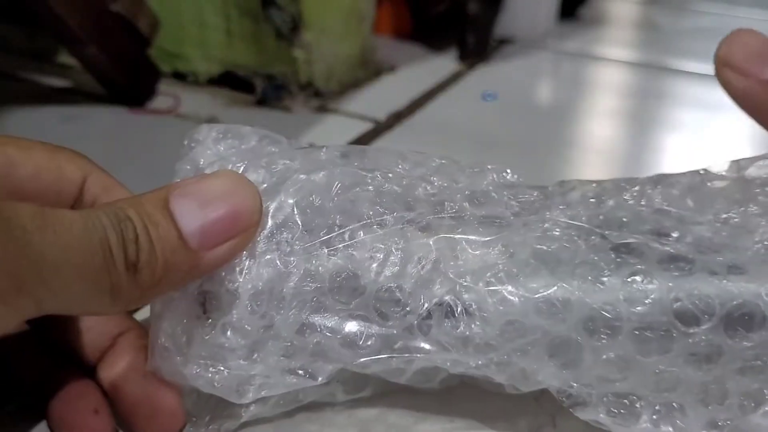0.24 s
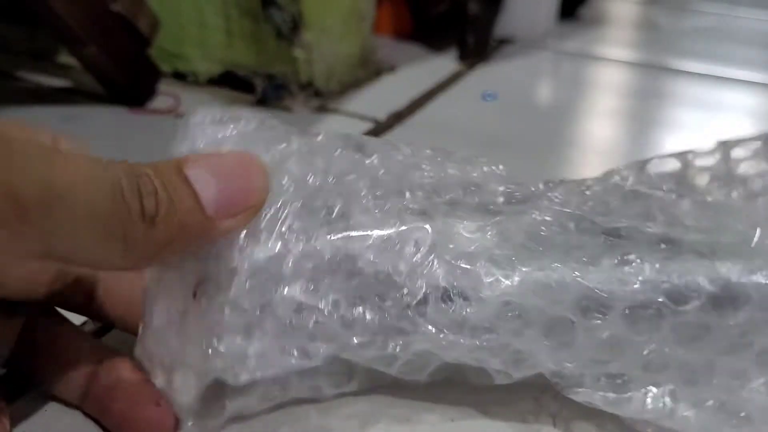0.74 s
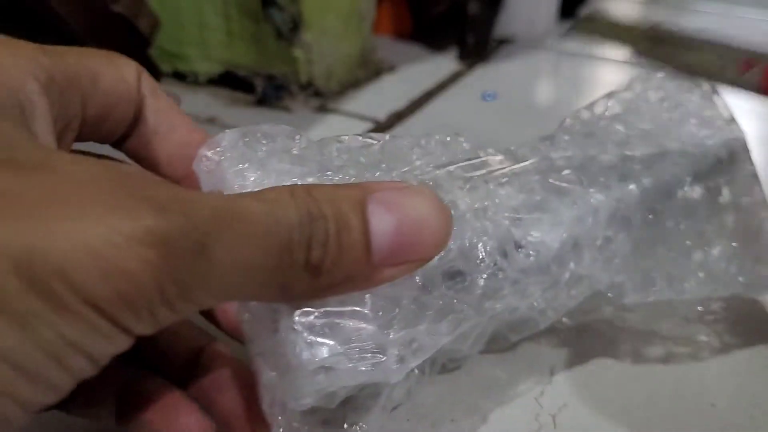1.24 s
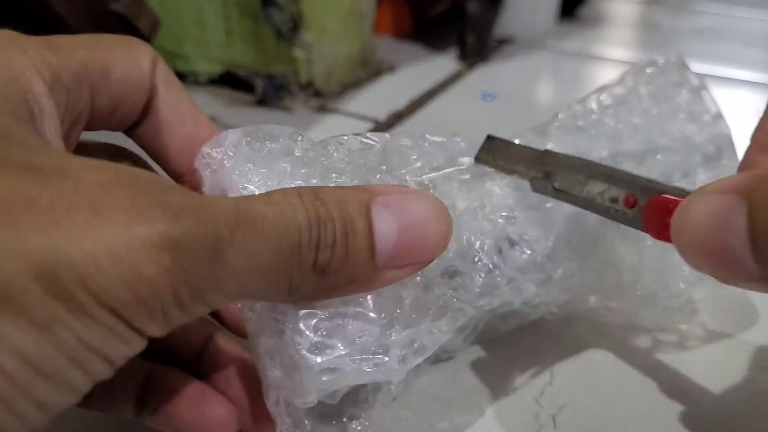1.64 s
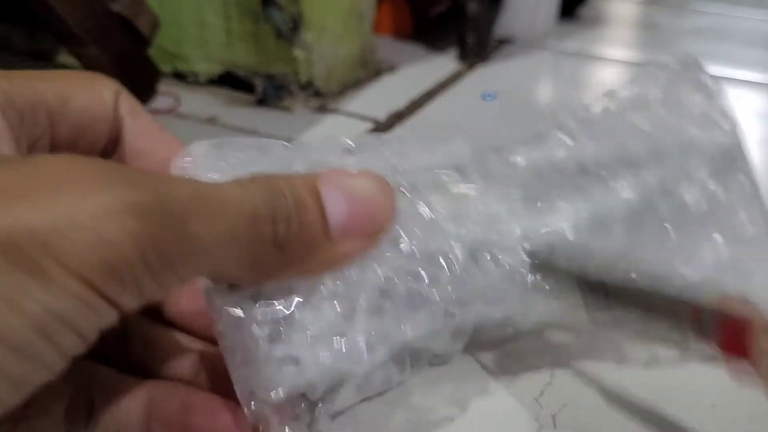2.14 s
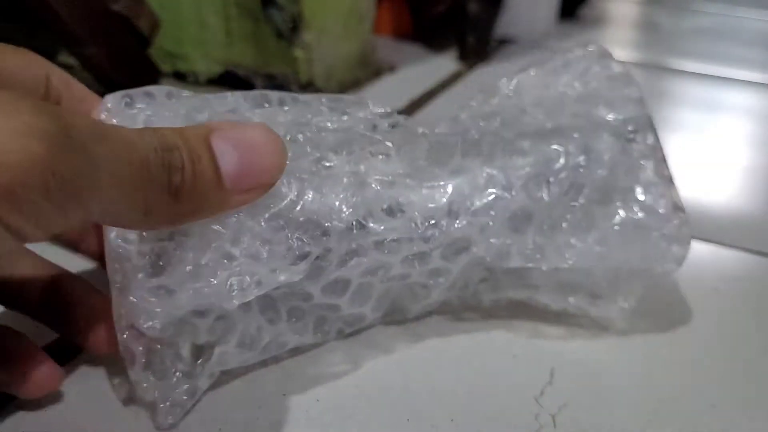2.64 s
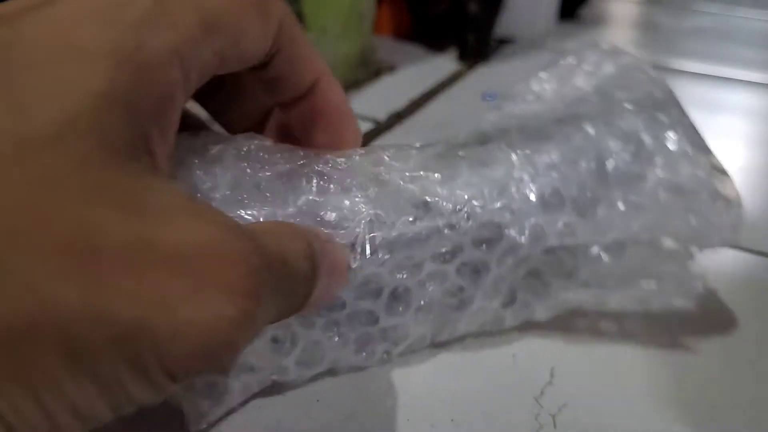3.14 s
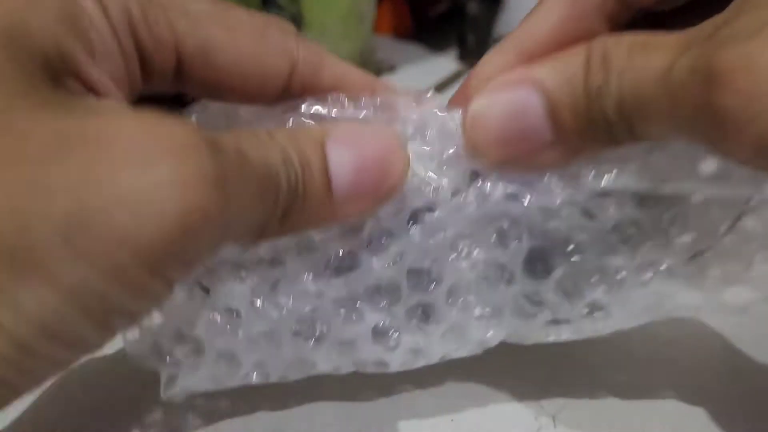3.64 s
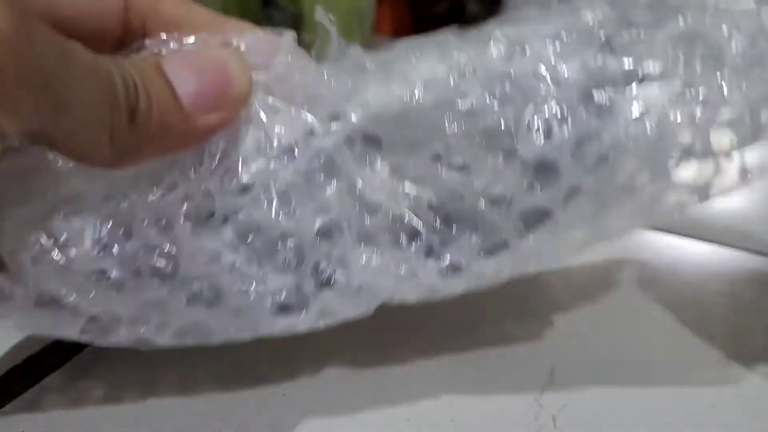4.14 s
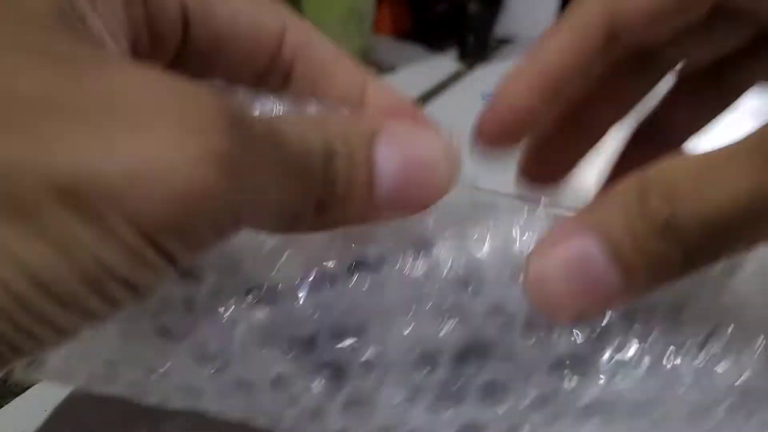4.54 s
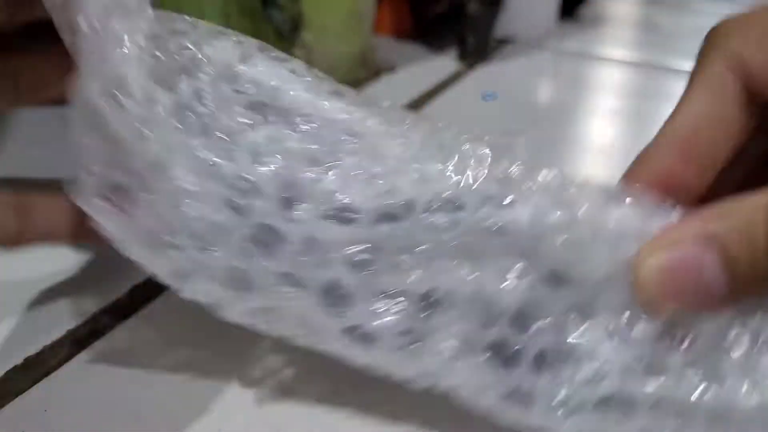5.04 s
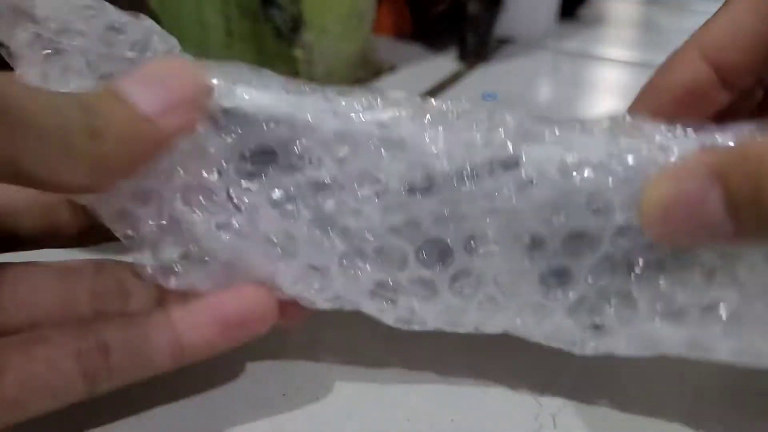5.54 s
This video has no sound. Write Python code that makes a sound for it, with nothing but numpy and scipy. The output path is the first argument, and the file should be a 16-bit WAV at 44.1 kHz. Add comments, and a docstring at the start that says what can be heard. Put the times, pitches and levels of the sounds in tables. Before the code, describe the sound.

Bubble wrap rustles, crinkles and snaps as hands work a parcel open close by, over a low engine idling outside.

```python
"""A taped bubble-wrap parcel is turned, cut and pulled open on a tiled floor, close to two microphones.
At first a small engine idles evenly outside, while the film rustles in tiny buckles and snaps in creases;
some snaps are bright cracks, others dull knocks of the parcel body. Just after 2 s the parcel thuds on
the tiles and the engine drops to a slow uneven chug. The hands get busier from 3 s and pull hardest
near 4 s. Near 5 s something bumps the microphone, mostly on the left, and a few last grips follow."""
import sys
import numpy as np
from scipy import signal
from scipy.fft import irfft, next_fast_len
from scipy.io import wavfile

SR = 44100
rng = np.random.default_rng(int(sys.argv[2]) if len(sys.argv) > 2 else 0)


def put_to_file(sound):
    """Save the sound as 16-bit audio at rate SR, in the file named by the first command-line argument."""
    columns = np.atleast_2d(sound).T  # one column per channel
    safe = np.clip(columns, -1, 1)
    whole_steps = np.round(safe * 32767)
    wavfile.write(sys.argv[1], SR, whole_steps.astype(np.int16))


N = 256220

# how alike the two microphones hear noise: f/Hz, correlation
MIC_CORRELATION = [(100, 1), (300, 0.82), (700, 0.31), (4000, 0.01)]
# room tone: f/Hz, relative density/dB
ROOM_SPECTRUM = [(170, -3.5), (300, 2), (790, -53), (1500, -17), (16000, -53)]
ROOM_DB, RUMBLE_START_DB = -60.5, -45

# engine outside, even idle: t/s, firing rate/Hz, level/dB
IDLE = [(0, 12.92, -38), (1.3, 12.92, -37.5), (1.7, 12.65, -37), (2.05, 12.5, -39), (2.3, 12.3, -46)]
# its slow single firings: t/s, relative level/dB
CHUGS = [(2.614, -40), (2.651, -42), (2.87, -42.5), (3.019, -40), (3.318, -41.5), (3.616, -44), (3.89, -44),
         (4.145, -38.5), (4.409, -41), (4.672, -39.5)]
# resonances of pipe and walls: f/Hz, width/Hz, gain/dB
EXHAUST_MODES = [(65.26, 2.97, 1), (79, 31.3, 11), (115.7, 7.2, 6.5)]
# push on the microphone: t/s, f/Hz, envelope peak/dB, t60/s, left minus right/dB
MIC_BUMP = (4.957, 55, -12.5, .035, 13)

# where the hands work between the microphones: t/s, left minus right/dB
HAND_PAN = [(0, 1), (2.8, 1.7), (3.3, -1.5), (3.5, 1.5), (5.8, 3)]
# parcel landing on the floor: t/s, relative level/dB
THUDS = [(2.07, -28), (2.226, -24.5), (2.262, -30), (3.978, -28), (4.945, -32.5)]
# resonance of the parcel on tile: f/Hz, gain/dB, t60/s
FLOOR_MODES = [(274, 14, 0.035)]
# resonances of the parcel body: f/Hz, gain/dB, t60/s
PARCEL_MODES = [(417, -9, 0.026), (584, -2, 0.029), (1100, -2.5, 0.013), (1404, 2, 0.015),
                (1850, 5.5, 0.0059)]
# rubbed parcel body: f/Hz, relative density/dB
RUB_SPECTRUM = [(290, 0), (570, 1.5), (780, -4), (1350, 2.5), (2000, 0), (3000, -2)]
# thin film: f/Hz, relative density/dB
FILM_SPECTRUM = [(1000, -21), (1900, -14.5), (3000, -9.5), (3900, -2), (5800, -6.5), (7600, -6),
                 (10700, -5.5), (16000, -6)]
# grips, turns and pulls: t/s at full strength, hold/s, film level/dB, body against film/dB
GRIPS = [(0.025, 0.0098, -32, -1.5), (0.117, 0.013, -41.5, -6), (0.461, 0.0068, -41, -1.5),
         (0.791, 0.026, -44.5, -1), (1.053, 0.0042, -39.5, -3.5), (1.149, 0.063, -46, -5.5),
         (1.795, 0.079, -45, -3), (1.982, 0.051, -40.5, -5.5), (2.074, 0.018, -35, 0.5),
         (2.237, 0.014, -29.5, 1.5), (2.469, 0.056, -50, -3.5), (2.741, 0.0089, -45, -3.5),
         (2.949, 0.024, -47, -1.5), (3.026, 0.012, -38, -10.5), (3.127, 0.14, -35.5, -15),
         (3.339, 0.2, -38, -5), (3.55, 0.21, -35.5, -6.5), (3.791, 0.12, -33, -8.5),
         (3.952, 0.065, -22, -4.5), (4.082, 0.12, -39, -11.5), (4.3, 0.12, -36.5, -12.5),
         (4.538, 0.079, -39.5, -4), (4.661, 0.025, -38, -4), (4.768, 0.17, -35.5, -6.5),
         (4.96, 0.056, -25, -3), (5.157, 0.15, -45.5, -7), (5.576, 0.012, -42, -4), (5.638, 0.09, -32, -17)]
ATTACK_S, RELEASE_S, AT_REST_DB = 0.06, 0.14, -62   # a grip rises from rest and sinks back
BUBBLE_RANGE_HZ, BUBBLE_T60_CYCLES = (2400, 11000), 20
# lone creases relaxing: t/s, relative level/dB
TICKS = [(0.2496, -29.5), (0.3584, -30.5), (0.3875, -33), (0.5048, -29), (0.5775, -25.5), (0.6614, -38),
         (0.7376, -33), (1.1532, -22), (2.6664, -24.5), (2.7257, -31), (4.1463, -16.5), (4.3204, -13.5)]
# creases snapping: t/s, crack level/dB, pocket ring against crack/dB, knock drive against crack/dB
SNAPS = [(.451, -38.5, 13.5, 2.5), (0.757, -31, 0.5, -29), (1.191, -18, -28, -60), (1.2, -36, 3, -22),
         (1.219, -29.5, -13, -38), (1.234, -28.5, -8, -33), (1.261, -26.5, -3, -39),
         (1.3222, -17.5, -4.5, -33), (1.793, -40.5, 5.5, 8), (1.838, -50.5, 18, 19), (2.0684, -19, -3, 7),
         (2.091, -33, -3, 9), (2.191, -40, 7, 15), (2.226, -24.5, -5, 11.5), (2.239, -23, -1, 10.5),
         (2.261, -12, -10, -2), (2.302, -18.5, -0.5, -35), (2.411, -31.5, -4, -4.5),
         (2.439, -26.5, -2, -23), (2.471, -18.5, -9.5, -44), (2.503, -44.5, 12.5, 14.5),
         (2.596, -49.5, 12, 15), (2.652, -34.5, 5, 1), (2.763, -41.5, -7, 10), (2.784, -25.5, -18, -42),
         (2.854, -26, -12, -16), (2.868, -31, -7, -25), (2.909, -29.5, -3, -13), (3.164, -11, -4, -27),
         (3.1767, -21.5, 3, -34), (3.21, -25, 3, -33), (3.227, -22, -2, -26), (3.239, -18.5, -8, -23),
         (3.29, -16.5, -8, -20), (3.567, -27, -19, 5), (3.834, -22, 5, 2), (3.849, -29.5, 9, 3),
         (3.867, -28.5, 9, 6.5), (3.895, -28.5, 8.5, -6), (3.934, -18.5, -1.5, 11), (4.542, -27.5, -2, 3),
         (4.683, -32, 0, 8), (4.804, -29, -17, 5), (4.931, -16, -24, -14), (4.945, -18, -25, 0),
         (4.957, -28.5, -7, 14.5), (5.016, -41, -5, 10), (5.0405, -27, 8, 8.5), ]
RATTLE_S = 0.0055   # a crease lets go in three steps within this time
# air pocket by the fingers, squeezed more or less: t/s, f/Hz
POCKET_PITCH = [(3.3, 4200), (3.8, 3000), (4.2, 3970)]
POCKET_T60_S, POCKET_SCATTER = 0.012, .13   # scatter as a share of the pitch


def from_db(db):
    """Decibels to gain."""
    return 10 ** (np.asarray(db) / 20)


def unit_rms(x):
    """Scale to rms 1."""
    return x / np.sqrt(np.mean(x ** 2) + 1e-20)


def sides(pan_db):
    """Gains at the left and right microphones."""
    return from_db([pan_db / 2, -pan_db / 2])


def in_time(rows):
    """A table's curves at every sample."""
    times, *columns = np.transpose(rows)
    return [np.interp(np.arange(N) / SR, times, column) for column in columns]


def at_hz(points, hz):
    """A curve read on a log frequency axis."""
    knots_hz, values = np.transpose(points)
    return np.interp(np.log(hz), np.log(knots_hz), values)


def butter(x, order, hz, kind="low"):
    """Butterworth filter."""
    return signal.sosfilt(signal.butter(order, hz, kind, fs=SR, output="sos"), x)


def stereo_noise(spectrum, low_hz=20, high_hz=20000):
    """Shaped noise, alike at both microphones in the bass and unrelated in the treble; rms 1."""
    size = next_fast_len(N, real=True)
    hz = np.maximum(np.fft.rfftfreq(size, 1 / SR), 1)
    real, imag = rng.standard_normal((2, 2, len(hz)))
    mid, side = real + 1j * imag
    alike = at_hz(MIC_CORRELATION, hz)
    edges = 1 / np.sqrt((1 + (low_hz / hz) ** 6) * (1 + (hz / high_hz) ** 6))
    both = np.sqrt(1 + alike) * mid + np.sqrt(1 - alike) * side * [[1], [-1]]
    return unit_rms(irfft(both * from_db(at_hz(spectrum, hz)) * edges, size)[:, :N])


def clicks_at(times, sizes):
    """A train of single clicks."""
    out = np.zeros(N)
    out[(times * SR).astype(int)] = sizes
    return out


def decay(clicks, t60):
    """Each click starts an envelope that falls 60 dB in t60 seconds."""
    return signal.lfilter([1], [1, -from_db(-60 / (t60 * SR))], clicks + 1e-18)


def resonate(drive, hz, t60):
    """One mode, ringing as a damped sine."""
    radius, angle = from_db(-60 / (t60 * SR)), 2 * np.pi * hz / SR
    return signal.lfilter([0, np.sin(angle)], [1, -2 * radius * np.cos(angle), radius ** 2], drive + 1e-18)


def room_tone():
    """The quiet room behind everything."""
    return from_db(ROOM_DB) * stereo_noise(ROOM_SPECTRUM, low_hz=140)


def exhaust(pulses):
    """Pressure pulses ring the pipe and wall resonances."""
    out = 0
    for k, (hz, width_hz, gain_db) in enumerate(EXHAUST_MODES):
        t60 = np.log(1000) / (np.pi * width_hz)
        out = out + (-1) ** k * from_db(gain_db) * resonate(pulses, hz, t60)
    return out


def engine_idle():
    """Heard from indoors: even firings of slightly unequal strength through a silencer, and casing noise."""
    firing_hz, level_db = in_time(IDLE)
    running = np.arange(N) < IDLE[-1][0] * SR
    fired = np.diff(np.floor(np.cumsum(firing_hz) / SR + .6), prepend=-1) * running
    pulses = fired * from_db(.7 * rng.standard_normal(N)) + .0013 * running * rng.standard_normal(N)
    silenced = unit_rms(butter(exhaust(pulses), 4, 135))
    casing = unit_rms(butter(rng.standard_normal(N), 2, [210, 380], "band"))
    idle = from_db(level_db) * (silenced + from_db(-16.5) * running * casing) * np.sqrt(running.mean())
    return idle + from_db(-21) * butter(idle, 4, 130) * [[1], [-1]]   # bass is uneven across the room


def engine_chugs():
    """Running slowly, the engine is duller: each firing is a blunt puff and a ring of the pipe."""
    times, level_db = np.transpose(CHUGS)
    firings = clicks_at(times, from_db(level_db))
    puff = butter(firings, 3, [48, 125], "band") * SR / 160
    puff = np.roll(puff, round(0.0088 * SR))   # the pressure peaks after the pipe starts ringing
    return puff + from_db(-7) * butter(exhaust(firings), 2, 105)


def engine_rumble():
    """Rough noise through the exhaust, fading steadily."""
    mid, side = unit_rms(butter(exhaust(rng.standard_normal((2, N)) * [[1], [.3]]), 2, 105))
    return from_db(RUMBLE_START_DB - 2.23 * np.arange(N) / SR) * (mid + side * [[1], [-1]])


def mic_bump():
    """A soft push on the microphone: a low swing that swells briefly and dies."""
    start, hz, peak_db, t60, pan_db = MIC_BUMP
    t = np.maximum(np.arange(N) / SR - start, 0)
    age = t * np.log(1000) / t60
    swell = from_db(peak_db) * (age / 2) ** 2 * np.exp(2 - age)
    return sides(pan_db)[:, None] * swell * -np.sin(2 * np.pi * hz * t)


def knocks(clicks, modes, spread_db):
    """Blows ring the parcel's modes, each mode with a strength of its own."""
    out, hit = 0, clicks != 0
    shape = rng.integers(0, 3, N)   # each blow finds the parcel squeezed to one of three shapes
    for hz, gain_db, t60 in modes:
        blows = np.zeros((2, N))
        blow_db = gain_db + spread_db * rng.standard_normal(hit.sum())
        blows[:, hit] = clicks[hit] * from_db(blow_db + rng.normal(0, 1.5, (2, hit.sum())))
        for k, squeeze in enumerate(1 + .08 * rng.permutation([-1, 0, 1])):
            out = out + resonate(blows * (shape == k), hz * squeeze, t60)
    out[1] = np.roll(out[1], shift=7)   # reaches the right microphone a little later
    return butter(out, 2, modes[0][0], "high")   # too small to radiate bass


def floor_thuds():
    """The parcel drops on the tiles."""
    times, level_db = np.transpose(THUDS)
    return knocks(clicks_at(times, from_db(level_db)), FLOOR_MODES, spread_db=0)


def grip_gains():
    """Film and body gains: each grip rises, holds and sinks; overlapping grips add in power."""
    t = np.arange(N) / SR
    film_power = body_power = from_db(AT_REST_DB) ** 2
    for start, hold_s, film_db, body_db in GRIPS:
        strength = np.minimum(1 + (t - start) / ATTACK_S, 1 - (t - start - hold_s) / RELEASE_S)
        gain = from_db(AT_REST_DB + (film_db - AT_REST_DB) * np.minimum(strength, 1)) * (strength > 0)
        film_power = film_power + gain ** 2
        body_power = body_power + (gain * from_db(body_db)) ** 2
    return np.sqrt(film_power), np.sqrt(body_power)


def buckles(per_s, spread_db):
    """Random tiny buckles, a few larger than most."""
    sizes = from_db(spread_db * np.minimum(rng.exponential(1, N), 3.2))
    return sizes * (rng.random(N) < per_s / SR)


def buckle_envelope(clicks, t60, sliding):
    """Dying buckles over a smooth sliding part; rms 1."""
    return unit_rms(sliding + unit_rms(decay(clicks, t60)))


def bubble_rings(clicks):
    """Each buckle rings one bubble of the wrap, at a pitch and a side of its own; rms 1."""
    out, bubble = 0, rng.integers(0, 14, N)
    placed = clicks * sides(4.8 * rng.standard_normal(N)) * rng.choice([-1, 1], (2, N))
    for k, hz in enumerate(np.geomspace(*BUBBLE_RANGE_HZ, num=14)):
        out = out + resonate(placed * (bubble == k), hz, BUBBLE_T60_CYCLES / hz)
    return unit_rms(out)


def crease_ticks(film_gain):
    """Lone creases relax, among faint ticks that follow the handling only loosely."""
    faint = from_db(-21) * np.sqrt(film_gain) * buckles(per_s=30, spread_db=3)
    times, level_db = np.transpose(TICKS)
    lone = clicks_at(times, from_db(level_db - 9))
    return decay(faint + lone, t60=0.018) * stereo_noise(FILM_SPECTRUM, low_hz=3520)


def rustle(film_gain, body_gain):
    """Close up, the film crackles; the parcel hisses under the fingers and is tapped by the buckles."""
    small, large = buckles(per_s=220, spread_db=2.5), buckles(per_s=71, spread_db=1.5)
    crackle = buckle_envelope(small + .6 * large, t60=.01, sliding=.65) * stereo_noise(FILM_SPECTRUM)
    bubbles = bubble_rings(small + 1.64 * large)
    rub = buckle_envelope(small, t60=0.046, sliding=0.31) * stereo_noise(RUB_SPECTRUM, high_hz=4400)
    blows = (large + 0.24 * small) * rng.choice([-1, 1], N)
    taps = unit_rms(knocks(blows, PARCEL_MODES, spread_db=3.5))
    return film_gain * (crackle + 0.2 * bubbles) + body_gain * (1.1 * rub + 0.46 * taps)


def pocket_rings(times, sizes):
    """Each step of a snap rings the nearest air pocket at a pitch of its own."""
    out = np.zeros((2, N + SR))
    t = np.arange(round(POCKET_T60_S * SR)) / SR
    pitches = np.interp(times, *np.transpose(POCKET_PITCH))
    for start, size, pitch in zip((times * SR).astype(int), sizes, pitches):
        hz = pitch * (1 + POCKET_SCATTER * rng.standard_normal())
        swing = np.sin(2 * np.pi * hz * t + rng.standard_normal((2, 1)))   # a phase for each microphone
        out[:, start:start + len(t)] += size * swing * from_db(-60 * t / POCKET_T60_S)
    return out[:, :N]


def crease_snaps():
    """Close up, each crease lets go with its own mix of bright crack, air pocket ring and dull knock."""
    times, crack_db, ring_db, knock_db = np.transpose(SNAPS)
    body = knocks(clicks_at(times, from_db(crack_db + knock_db - 5)), PARCEL_MODES, spread_db=3)
    late, weaker = rng.random((len(times), 2, 3)).transpose(1, 0, 2)
    late[:, 0] = 0   # the first step is on time and tends to be the strongest
    weaker[:, 0] /= 2
    step_times = (times[:, None] + RATTLE_S * late).ravel()
    step_db = (crack_db[:, None] - 6.6 * weaker).ravel()
    rings = pocket_rings(step_times, from_db(step_db + np.repeat(ring_db, 3)))
    steps = clicks_at(step_times, from_db(step_db))
    burst = decay(steps, t60=.012) - decay(steps, t60=.0017)   # finite rise
    tail = from_db(-21.5) * decay(steps, t60=0.095)   # off floor and walls
    return body + rings + (burst + tail) * stereo_noise(FILM_SPECTRUM, low_hz=6400)


def scene():
    """The parcel close to the microphones, the engine outside, the bump and the room."""
    film_gain, body_gain = grip_gains()
    parcel = rustle(film_gain, body_gain) + crease_ticks(film_gain) + crease_snaps() + floor_thuds()
    engine = engine_idle() + engine_chugs() + engine_rumble()
    return room_tone() + engine + mic_bump() + sides(in_time(HAND_PAN)[0]) * parcel


def record(dry):
    """Peaks are rounded and the top is cut steeply."""
    stop_hz = 16200
    return signal.sosfilt(signal.cheby2(14, 60, stop_hz, fs=SR, output="sos"), np.tanh(dry))


dry = scene()
out = record(dry)
put_to_file(out)
```